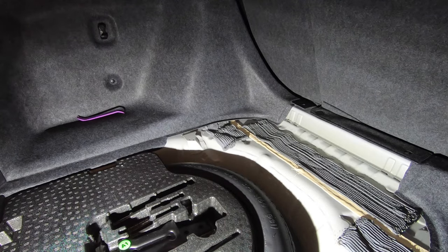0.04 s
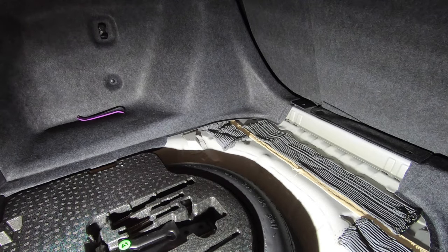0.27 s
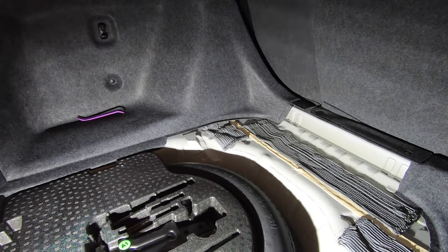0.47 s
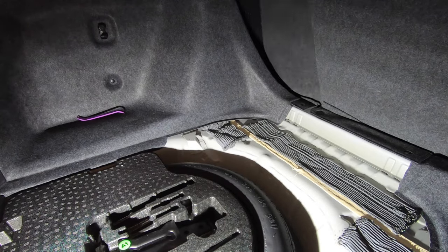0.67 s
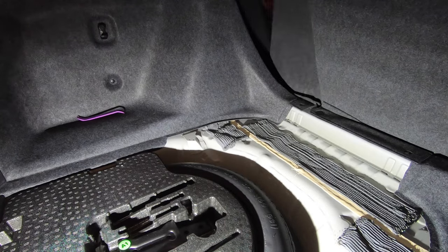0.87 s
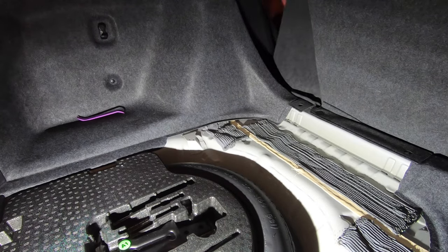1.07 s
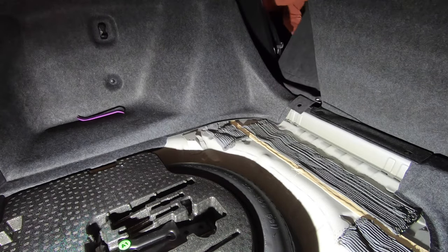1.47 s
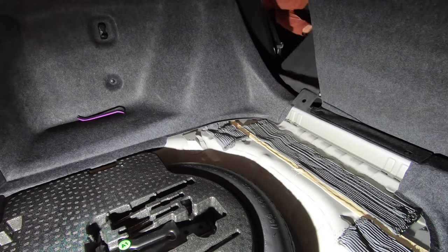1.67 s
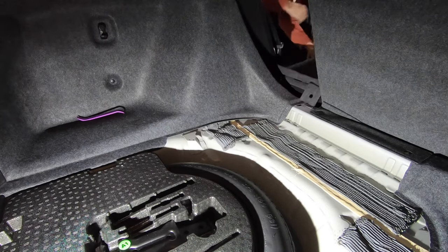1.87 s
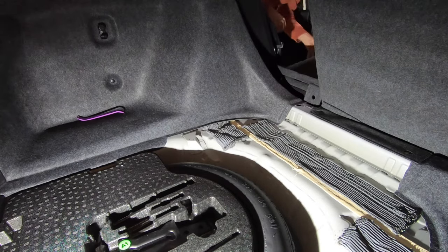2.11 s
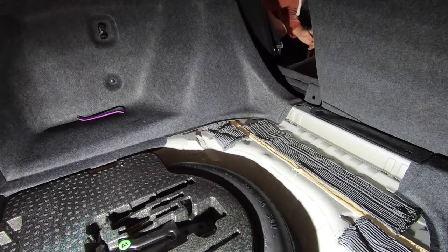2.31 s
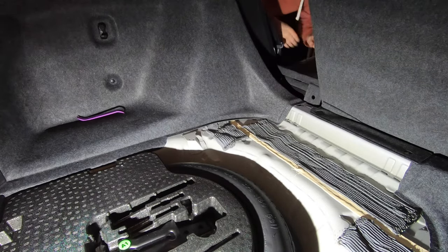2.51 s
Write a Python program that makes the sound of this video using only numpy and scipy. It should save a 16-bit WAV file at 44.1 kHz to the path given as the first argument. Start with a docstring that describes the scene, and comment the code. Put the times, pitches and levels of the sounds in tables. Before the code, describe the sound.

Car seat back folding forward: a latch click, felt rubbing and a soft landing thump.

```python
"""A rear seat back is unlatched and folded forward, heard from inside a carpeted car trunk.
First a hand pushes and flexes the panel; every push booms in the trunk cavity. The latch clicks, its
spring snaps and the striker slips out. The panel drags free of its seal and its felt rubs on as it
swings down to a soft thump near 1.9 s, then it slides into place with a brief scuff of plastic.
A machine hums steadily in the background throughout."""
import sys
import numpy as np
from scipy import signal
from scipy.fft import rfft, irfft, next_fast_len
from scipy.io import wavfile
from scipy.ndimage import uniform_filter1d, map_coordinates

SR = 44100
rng = np.random.default_rng(int(sys.argv[2]) if len(sys.argv) > 2 else 0)


def dump(signal):
    """Clip the signal to [-1, 1] and save it as 16-bit WAV at the path in sys.argv[1]."""
    limited = np.clip(np.atleast_2d(signal).T, -1, 1)
    pcm = np.round(limited * 32767).astype(np.int16)
    wavfile.write(sys.argv[1], SR, pcm)


N = 116865


def undb(db):
    """Decibels to gain."""
    return 10 ** (np.asarray(db) / 20)


def unit(x):
    """Scale to rms 1."""
    return x / np.sqrt(np.mean(x ** 2))


def clock():
    """Time of every sample in seconds."""
    return np.arange(N) / SR


def curve(points):
    """Gain envelope through (t/s, level/dB) points, silent outside them."""
    return undb(np.interp(clock(), *np.array(points).T, left=-200, right=-200))


def fade(start, t60):
    """Decay that begins at start and loses 60 dB in t60 seconds."""
    age = clock() - start
    return (age >= 0) * np.exp(-np.log(1000) * np.maximum(age, 0) / t60)


def wander(rate_hz):
    """Smooth random modulation of rms 1."""
    steps = np.interp(clock() * rate_hz, np.arange(1024), rng.standard_normal(1024))
    return unit(uniform_filter1d(steps, int(SR / rate_hz)))


def colour(x, points, tilt_db=0):
    """Causal EQ through (f/Hz, level/dB) points, rolled off below the first, tilted per octave."""
    hz, db = np.array(points, float).T
    size = 2 * next_fast_len(N)
    knots = np.log2(hz)
    octave = np.log2(np.maximum(np.arange(size // 2 + 1) * SR / size, 1))
    gain_db = np.interp(octave, knots, db) - 10 * np.maximum(knots[0] - octave, 0)
    gain_db += tilt_db * (np.clip(octave, knots[0], knots[-1]) - knots.mean())
    cepstrum = irfft(gain_db * np.log(10) / 20)
    cepstrum[1:size // 2] *= 2  # fold for minimum phase
    cepstrum[size // 2 + 1:] = 0
    return irfft(rfft(x, size) * np.exp(rfft(cepstrum)))[..., :N]


def spread(pair):
    """Left and right from unrelated mid and side signals: bass centred, treble wide."""
    # stereo width, side relative to mid: f/Hz, level/dB
    width = [(60, -20.5), (150, -16.5), (280, -12), (500, -12.5), (1000, -1), (1500, -4.5), (2300, -8),
             (4000, -5.5), (8000, -0.5)]
    mid, side = pair
    return mid + colour(side, width) * np.array([[1], [-1]])


def ring(start, modes, attack_s=0.0005):
    """Modes (f/Hz, level/dB, t60/s) set ringing at start."""
    age = clock() - start
    tones = sum(undb(db) * fade(start, t60) * np.sin(2 * np.pi * hz * age) for hz, db, t60 in modes)
    return np.clip(age / attack_s, 0, 1) * tones


def burst(envelope, spectrum, tilt_db=0):
    """Dense short-lived resonances of a body: filtered noise at the level of the envelope."""
    noise = colour(rng.standard_normal((2, N)) * envelope, spectrum, tilt_db)
    response = colour(np.eye(1, N), spectrum, tilt_db)
    return spread(noise / np.linalg.norm(response))


def friction(spectrum, grains_per_s=20000, scatter_db=1.5, flutter_db=1):
    """Many tiny catches of fibres, uneven in size, coloured by the rubbing body."""
    catches = rng.random((2, N)) < grains_per_s / SR
    grains = catches * rng.standard_normal((2, N)) * undb(scatter_db * rng.standard_normal((2, N)))
    return spread(unit(colour(grains, spectrum))) * undb(flutter_db * wander(rate_hz=43.08))


def seat_thumps():
    """Each soft push or landing booms in the trunk and knocks the padded panel."""
    # pushes and landings: t/s, boom level/dB, contact/s, knock level/dB
    pushes = [(0.099, -32, 0.0037, -58), (0.119, -34.5, 0.0047, -42), (0.133, -36, 0.012, -49),
              (0.155, -28.5, 0.0089, -73), (0.343, -33.5, 0.0102, -45), (0.373, -34, 0.0025, -39.5),
              (0.483, -17.5, 0.015, -44), (0.514, -19, 0.0115, -35), (0.549, -32, 0.0099, -61),
              (0.655, -36, 0.0041, -60), (0.888, -36, 0.0019, -45), (1.701, -35, 0.0051, -37),
              (1.716, -32, 0.0043, -43), (1.877, -20.5, 0.0079, -33), (1.888, -19, 0.011, -38.5),
              (1.905, -23, 0.0073, -46), (1.93, -55, .004, -37), (1.95, -24, 0.012, -46.5),
              (2.02, -34.5, 0.0067, -53), (2.138, -43, 0.0054, -40.5), (2.192, -38, 0.0049, -43)]
    # modes of the trunk's air and shell: f/Hz, level/dB, t60/s
    trunk_modes = [(32.5, -36.5, 0.55), (58.1, 7, 0.2), (79.7, 2.5, 0.14), (100.6, -3.5, 0.26),
                   (139.7, -3.5, 0.33)]
    # dull tone of the knocked panel: f/Hz, level/dB
    knock_spectrum = [(80, 1.5), (150, 5.5), (250, -4.5), (340, -4.5), (480, -14.5), (800, -24.5),
                      (1600, -26), (4000, -43), (9000, -70)]
    boom, knock_envelope = 0, 0
    for start, boom_db, contact_s, knock_db in pushes:
        # half-sine force: a longer contact gives a darker boom
        force = np.sin(np.pi * np.clip(np.arange(SR // 20) / SR / contact_s, 0, 1))
        boom += undb(boom_db) * signal.fftconvolve(ring(start, trunk_modes), force / force.sum())[:N]
        knock_envelope += undb(knock_db) * fade(start, t60=0.094)
    return boom + burst(knock_envelope, knock_spectrum)


def panel_flex():
    """The panel flexes like a drum skin under the hand."""
    # flexes: t/s, level/dB
    flexes = [(.094, -28.5), (0.123, -24), (0.36, -31), (1.713, -37)]
    # the panel's hollow note: f/Hz, level/dB, t60/s
    panel_modes = [(146.1, -4.5, 0.18)]
    return sum(undb(db) * ring(start, panel_modes) for start, db in flexes)


def shell_knock():
    """The shell rings with one hollow knock in mid swing."""
    # shell modes: f/Hz, level/dB, t60/s
    shell_modes = [(263, -5, 0.21), (310, 0, 0.17), (315, -22, 0.062)]
    return undb(-35.5) * ring(start=0.892, modes=shell_modes)


def latch():
    """Catch and hinge click, the spring snaps open and the striker rings as it slips out."""
    # latch and hinge clicks: t/s, level/dB, tilt/(dB per octave), t60/s
    hits = [(0.333, -45, -2, 0.043), (0.3441, -39.5, 0, 0.056), (0.3538, -39, 2, 0.067),
            (0.367, -42.5, -4.5, 0.065), (0.483, -50.5, 5.5, 0.16), (0.493, -40, 3.5, 0.028),
            (1.882, -47.5, 0, 0.11), (1.893, -48.5, 1, 0.043), (1.902, -47.5, 5.5, 0.031)]
    # tone of the latch body: f/Hz, level/dB
    body_spectrum = [(200, -6), (420, 4), (540, 5.5), (760, 14), (930, -6.5), (1300, 8.5), (1800, 4),
                     (2300, 4), (2700, -11.5), (3000, -4.5), (3900, -13.5), (5600, -11.5), (7000, -29),
                     (10000, -27), (14000, -52)]
    # modes of the catch and its spring: f/Hz, level/dB, t60/s
    spring_modes = [(1200, -12, 0.081), (1400, 6, 0.3), (1580, -11, 0.16), (2288, -11, 0.07),
                    (3220, -1, 0.044), (5400, -8, 0.058), (7840, -4, 0.024), (8130, -8, 0.042),
                    (7870, -13, .03)]
    # slips of the striker: t/s, level/dB
    slips = [(.4845, -34.5), (.493, -37)]
    # striker modes: f/Hz, level/dB, t60/s
    striker_modes = [(1077, -9, 0.1), (3310, -18, 0.16), (3526, -3.5, 0.059), (3844, -9.5, 0.063),
                     (4000, -9.5, 0.037)]
    clicks = sum(burst(undb(db) * fade(start, t60), body_spectrum, tilt) for start, db, tilt, t60 in hits)
    spring = undb(-52.5) * ring(start=0.345, modes=spring_modes)
    striker = sum(undb(db) * ring(start, striker_modes) for start, db in slips)
    return clicks + spring + striker


def seal_drag():
    """Coarse, dark friction as the panel drags past its seal."""
    # swell of the drag: t/s, level/dB
    envelope = [(.41, -56), (.44, -45), (.452, -38), (.47, -32.5), (.492, -31.5), (.51, -33), (.53, -48),
                (.58, -54), (.7, -59)]
    # tone of the drag: f/Hz, level/dB
    spectrum = [(100, 5.5), (160, 3.5), (215, -14), (280, -4), (350, 5.5), (420, -1), (520, -4.5),
                (750, -7.5), (1000, -15), (2000, -19.5), (3700, -24), (5000, -40), (9000, -48),
                (14000, -66)]
    return friction(spectrum, grains_per_s=9000, scatter_db=1, flutter_db=0.7) * curve(envelope)


def felt_rub():
    """Felt rubs at the first push and all through the swing, its fibres hissing on top."""
    # swell of the rub: t/s, level/dB
    rub_envelope = [(.08, -80), (.105, -64.5), (.16, -67), (.21, -78), (.37, -70), (.405, -51), (.445, -46),
                    (.49, -47), (.57, -46), (.68, -52.5), (.79, -48), (.89, -49.5), (.95, -50.5),
                    (1.11, -56.5), (1.2, -53.5), (1.43, -59), (1.6, -55.5), (1.68, -54.5), (1.76, -56.5),
                    (1.85, -55.5), (1.9, -54), (1.95, -61), (2.04, -77)]
    # tone of the rub: f/Hz, level/dB
    rub_spectrum = [(110, -8), (143, 16.5), (185, -3.5), (280, 7.5), (400, -3.5), (550, -3.5), (750, 3.5),
                    (920, -8.5), (1100, -3.5), (1800, -4), (2400, -2), (3300, -8), (4000, -12.5),
                    (4900, -18.5), (5600, -21), (8200, -18.5), (9300, -26.5), (10200, -26.5),
                    (11500, -38.5), (14000, -41.5)]
    # swell of the fibre hiss: t/s, level/dB
    hiss_envelope = [(.08, -96), (.105, -82), (.16, -82), (.2, -95), (.37, -90), (.385, -80), (.43, -61.5),
                     (.48, -56), (.53, -64.5), (.7, -71), (.88, -63.5), (1.05, -75), (1.18, -71),
                     (1.42, -82), (1.61, -66), (1.68, -74.5), (1.84, -73), (1.91, -70.5), (1.95, -78),
                     (2.03, -88)]
    # tone of the hiss: f/Hz, level/dB
    hiss_spectrum = [(3500, -27), (5600, 7.5), (8200, -0.5), (9300, -9.5), (10200, 1.5), (11500, -19),
                     (14000, -17)]
    return friction(rub_spectrum) * curve(rub_envelope) + friction(hiss_spectrum) * curve(hiss_envelope)


def panel_slide(sag_oct_per_s=0.3):
    """The lowered panel slides into place; its rubbed resonances sink as the contact eases."""
    # swell of the slide: t/s, level/dB
    envelope = [(2.06, -82), (2.14, -61), (2.22, -71), (2.3, -61.5), (2.35, -57), (2.41, -55.5),
                (2.47, -58), (2.55, -59), (2.65, -65)]
    # panel resonances at mid slide: f/Hz, level/dB
    spectrum = [(550, -7), (780, 9), (930, -15.5), (1150, -1.5), (1430, 3), (1650, -5.5), (1780, 0),
                (1920, -8), (2120, 0), (2550, -22), (2870, -0.5), (3000, -14), (3170, -9), (3700, -16),
                (5000, -21.5), (8000, -35), (12000, -52)]
    rub = friction(spectrum, scatter_db=3)
    times = np.array(envelope)[:, 0]
    speed = 2 ** (-sag_oct_per_s * (clock() - times.mean()))  # varispeed lowers the pitch
    position = np.cumsum(speed * (clock() > times[0]))
    sinking = np.array([map_coordinates(channel, [position], mode="mirror") for channel in rub])
    return sinking * curve(envelope)


def plastic_scuff():
    """A brief, soft scuff of plastic once the seat back is down."""
    # swell of the scuff: t/s, level/dB
    envelope = [(2.366, -76), (2.379, -61.5), (2.386, -63), (2.40, -76)]
    # its thin, bright tone: f/Hz, level/dB
    spectrum = [(3000, 7), (5000, -11), (6900, -3), (7700, -5), (8500, -4), (9500, -13), (13000, -25)]
    return burst(curve(envelope), spectrum)


def trunk_walls(x, wet_db=-9, low_cut_hz=1530):
    """The trunk's near walls add a very short pattern of echoes to the treble."""
    echoes = rng.standard_normal((2, N)) * fade(start=0.00199, t60=0.029)
    echoes = spread(echoes / np.linalg.norm(echoes, axis=1, keepdims=True))
    treble = signal.sosfilt(signal.butter(2, low_cut_hz, "high", fs=SR, output="sos"), x)
    return x + undb(wet_db) * signal.fftconvolve(treble, echoes, axes=1)[:, :N]


def machine_hum(waver_hz=15):
    """A background machine hums; each partial wavers in level and phase."""
    # hum partials: f/Hz, level/dB, waver depth
    partials = [(58.74, -38.5, 0.049), (143.25, -51, 0.096), (233.3, -63, 0.93), (344.2, -57, 0.11),
                (401.1, -59.5, 0.16), (459.6, -61, 0.47), (568.7, -70, 0.26), (687, -75.5, 1),
                (744.6, -66, 0.099), (782, -77.5, 0.33)]
    hum = np.zeros((2, N))
    for hz, db, depth in partials:
        for channel in range(2):
            waver = 1 + depth * (wander(waver_hz) + 1j * wander(waver_hz))
            tone = np.exp(2j * np.pi * (hz * clock() + rng.random()))
            hum[channel] += undb(db) * unit(np.real(waver * tone))
    return spread(hum)


def air_bed(level_db=-46):
    """A steady, low rush of air behind everything."""
    # tone of the air: f/Hz, level/dB
    spectrum = [(22, -8.5), (32, 7.5), (45, 4), (90, 4.5), (130, 1), (200, -13), (350, -13), (560, -19.5),
                (760, -21), (950, -25.5), (1500, -24), (2800, -30), (4200, -38), (7000, -45.5),
                (10000, -53.5), (12000, -74.5)]
    return spread(undb(level_db) * unit(colour(rng.standard_normal((2, N)), spectrum)))


def scene():
    """Low thumps, then clicks and friction with their wall echoes, over hum and air."""
    thumps = seat_thumps() + panel_flex() + shell_knock()
    contacts = latch() + seal_drag() + felt_rub() + panel_slide() + plastic_scuff()
    return thumps + trunk_walls(contacts) + machine_hum() + air_bed()


def record(dry):
    """A gentle low cut at 20 Hz and a steep high cut at 14.4 kHz."""
    dry = signal.sosfilt(signal.butter(2, 20, "high", fs=SR, output="sos"), dry)
    return signal.sosfilt(signal.ellip(8, 0.2, 70, 14400, fs=SR, output="sos"), dry)


dry = scene()
out = record(dry)
dump(out)
```